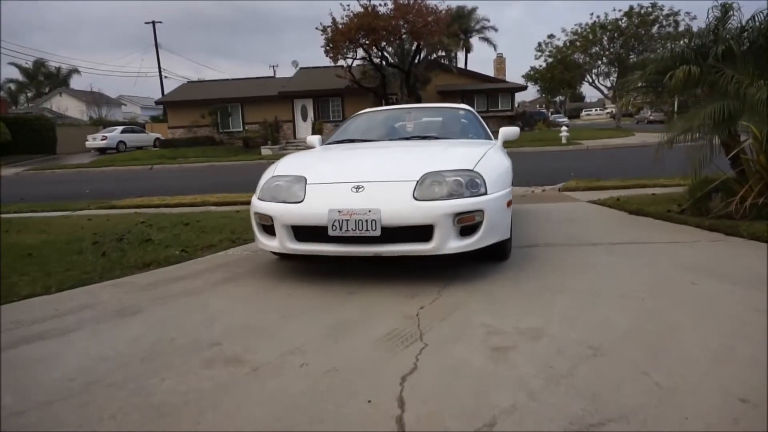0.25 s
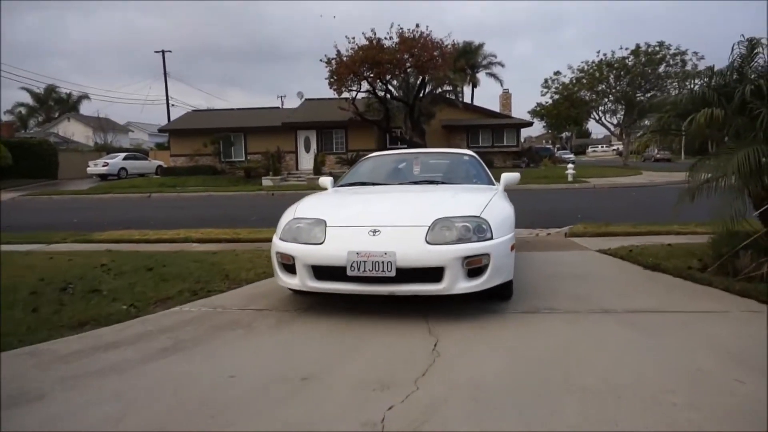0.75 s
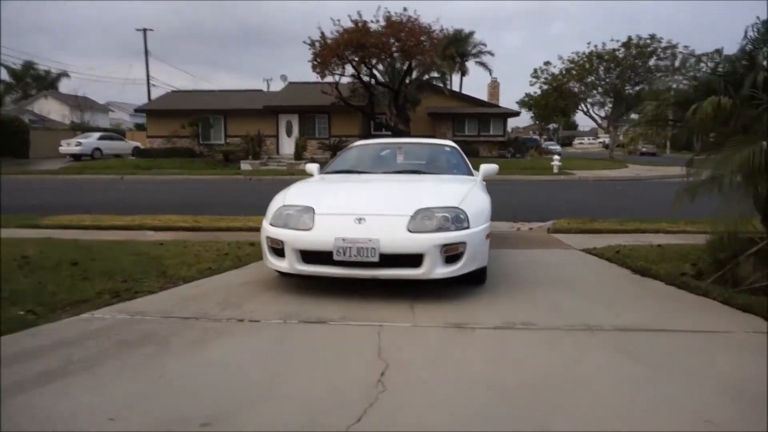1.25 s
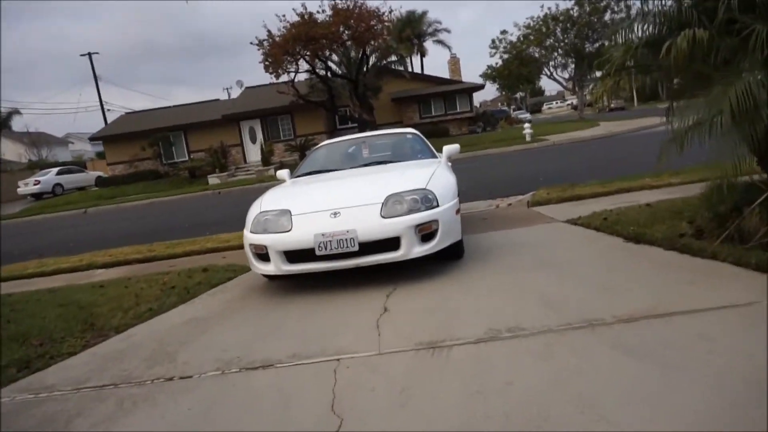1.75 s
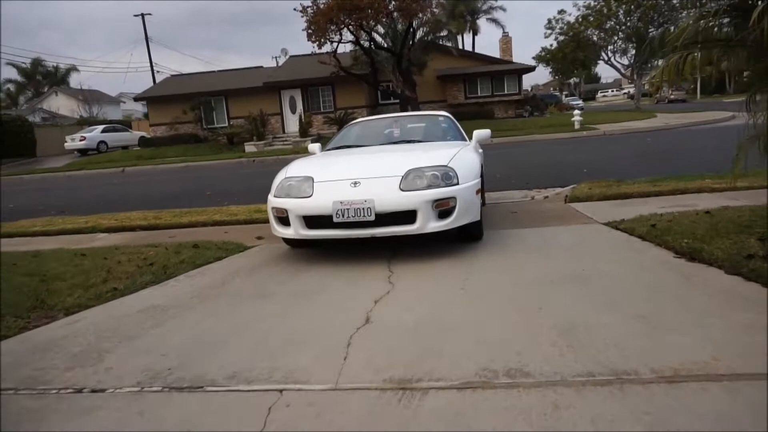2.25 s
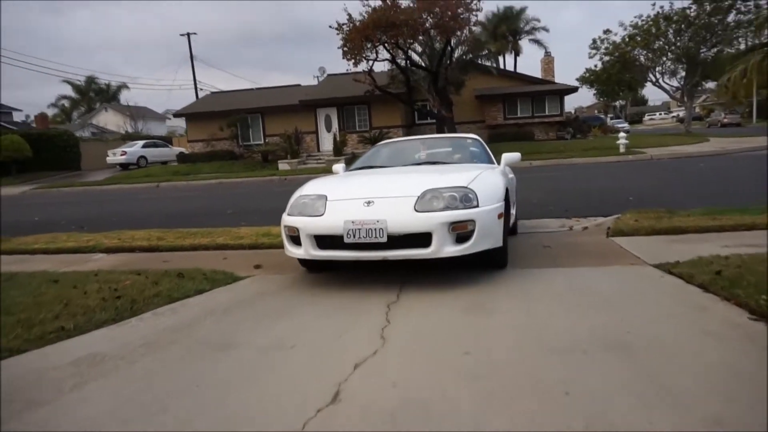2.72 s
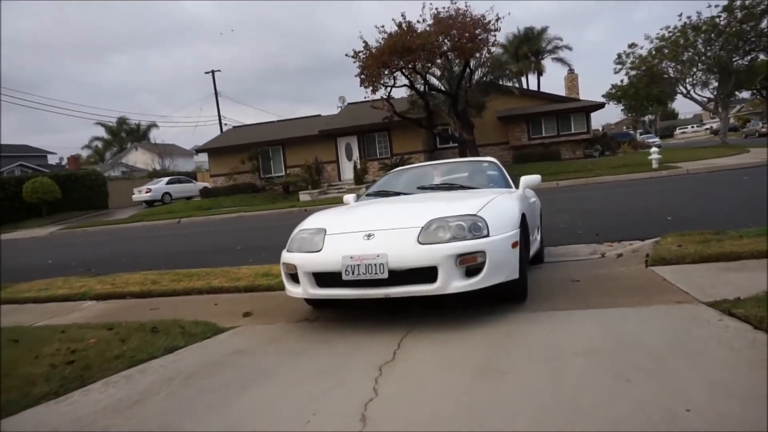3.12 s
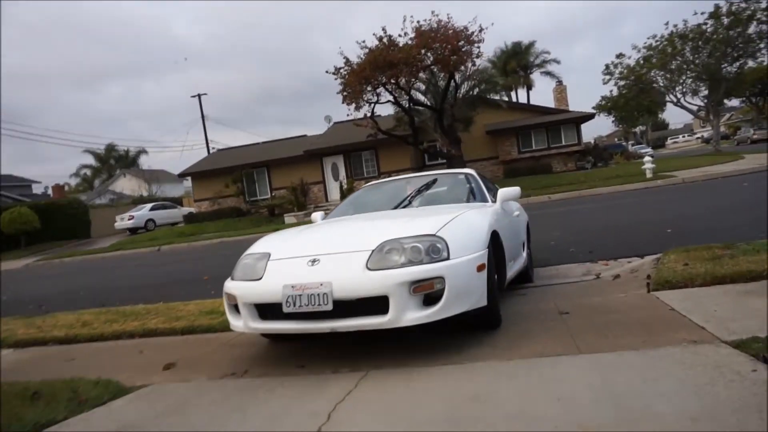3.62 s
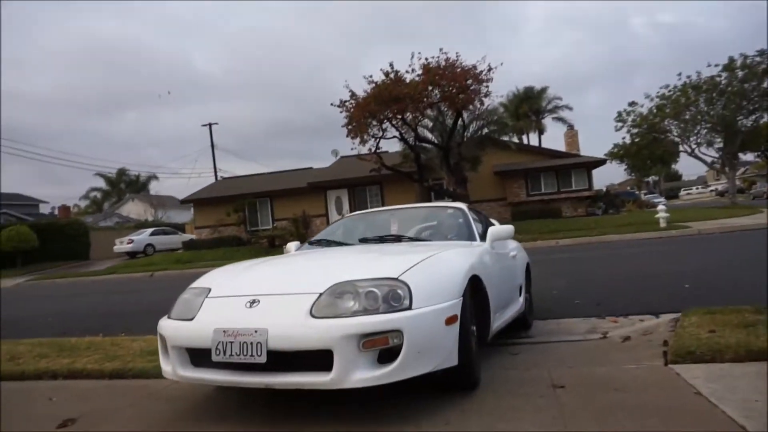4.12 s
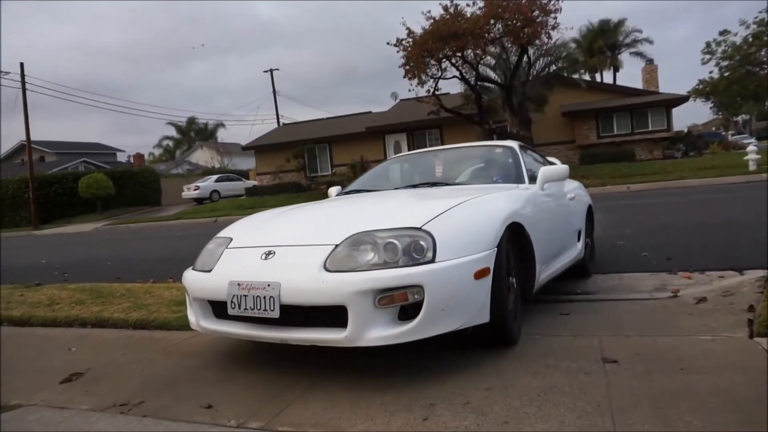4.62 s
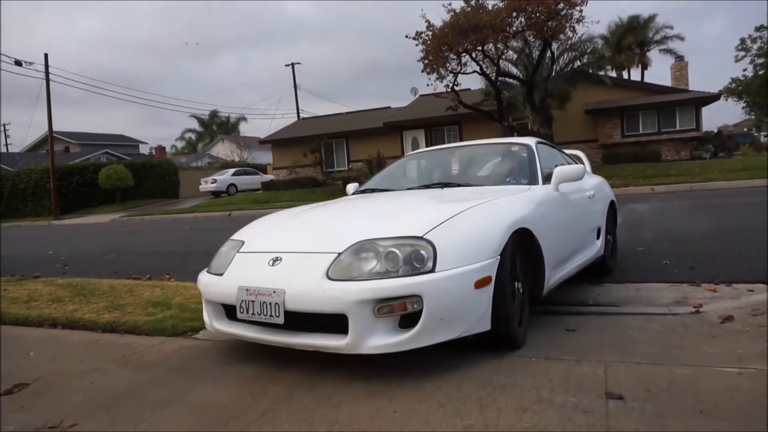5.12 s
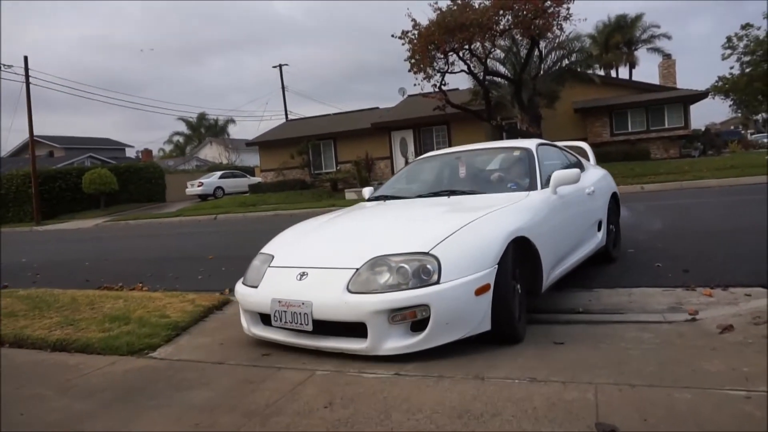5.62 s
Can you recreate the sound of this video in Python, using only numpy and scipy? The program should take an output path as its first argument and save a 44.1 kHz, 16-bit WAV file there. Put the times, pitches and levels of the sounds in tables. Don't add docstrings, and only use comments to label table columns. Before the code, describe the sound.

Outdoors, a low car faces the microphone at close range, its open exhaust burbling deep, fast and uneven over soft rumble and light breeze. Engine fan, belts and valve gear add a wide hiss and fine clatter. Grit snaps at 0.2 and 0.3 seconds; hollow bumper knocks follow at 0.4, 0.8 and in a cluster around 1.1 to 1.2, with heavier thuds at 1.5 to 1.6. The idle continues, boomier from about 2.2. Sharp body knocks land at 3.4 to 3.5 and 3.8, then a hard wind thump near 3.9, with the overall level briefly ducking after loud blows. From 3.8 the revs climb, smoother, with raspy intake, jumping at 4.7 to a throaty peak around 4.9. A thin high brake squeak slips in at 5.0 to 5.15 as the revs fall. The exhaust becomes quieter, leaving fading hiss and faint grit ticks until 5.9.

```python
import sys
import numpy as np
from scipy import signal
from scipy.io import wavfile

SR = 44100
rng = np.random.default_rng(int(sys.argv[2]) if len(sys.argv) > 2 else 0)


def rack_gain(trim_db):
    fader = np.asarray(trim_db, float)
    return 10 ** (fader / 20)


def store_pcm(level_fs):
    pcm = np.round(np.clip(level_fs, -1, 1) * 32767).astype(np.int16)
    wavfile.write(sys.argv[1], SR, np.atleast_2d(pcm).T)


N = 258862
STEP = 64

# start_s (centre), peak_db, half_length_s
GUSTS = [
    (.89, -42, .05),
    (1.07, -30, 0.045),
    (2.75, -32.5, 0.36),
    (3.27, -24.5, 0.12),
    (3.62, -28, .13),
    (3.93, -9, 0.039),
    (4.05, -18, 0.07),
    (4.143, -23, .015),
    (4.7, -21, 0.086),
]
BREEZE_DB = -25

RUMBLE_DB, RUMBLE_FOLLOWS, RUMBLE_LUMPS_DB = -17.5, 0.89, 2.5
SHELTER_S, SHELTER_FADE_S, SHELTER_DB = (4.72, 5.1), 0.1, -13

# start_s, peak_db
TICKS = [
    (0.2254, -10),
    (0.3054, -12),
    (1.5708, -22),
    (3.494, -22),
    (3.9277, -10),
    (4.02, -15),
    (4.25, -30),
    (5.3649, -28),
    (5.8237, -26),
]
# start_s, peak_db, pitch_hz, t60_s, crack_db
KNOCKS = [(0.442, -8.5, 466, 0.026, -6), (0.805, -14, 595, 0.04, -6), (1.123, -9.5, 660, 0.031, -6),
          (1.142, -15, 651, 0.028, -16), (1.164, -14, 540, 0.031, -17), (1.196, -7, 503, 0.018, -5),
          (1.208, -11, 593, 0.045, -19), (1.534, 1, 635, 0.023, -24), (1.606, -1, 704, 0.021, -27),
          (1.617, 0, 636, 0.017, -29), (2.75, -27, 630, 0.024, -2), (3.047, -16, 652.5, 0.024, 2),
          (3.43, -15, 592, 0.028, 6), (3.524, -4.5, 580, 0.03, -4), (3.53, -1.5, 560, 0.033, -17),
          (3.536, -6, 395, 0.052, -3), (3.54, -7.5, 940, 0.022, 4), (3.546, 2.5, 532, 0.031, -1),
          (3.775, -1.5, 379.5, 0.02, -6), (3.781, -3, 610, 0.022, -14), (3.788, -2, 571, 0.041, -6)]
# start_s (centre), pitch_hz, level_db
SQUEAK_GRIPS = [
    (5.038, 1605, -27),
    (5.063, 1560, -22),
    (5.102, 1595, -21.5),
    (5.14, 1570, -22),
]
GRIP_S, SAG_HZ_PER_S = 0.012, 2000

# start_s, level_db
RASP = [(3.85, -28), (3.95, -29), (4.03, -24.5), (4.2, -25), (4.48, -21), (4.7, -26), (4.92, -28.5),
        (5.08, -34.5), (5.45, -38)]
# pitch_hz, width_hz, level_db
RASP_RINGS = [
    (1409, 87, 13),
    (1340, 90, 5),
    (1460, 36, -5),
]

# start_s, level_db
BAY = [(0, -26), (.88, -27), (1.11, -30), (1.63, -29.5), (1.68, -29), (1.95, -28.5), (2.3, -26),
       (2.66, -24), (2.79, -26.5), (3.24, -29.5), (3.69, -29.5), (3.74, -26.5), (3.8, -29.5), (4.15, -31),
       (4.5, -25), (4.74, -26), (5.0, -25.5), (5.87, -36)]
BAY_MEAN_DB = -27
# pitch_hz, density_db (per hertz)
BAY_COLOUR = [(190, -33), (330, 0.5), (661, -4.5), (1110, -2.5), (1920, 1), (2330, -10), (3550, -17),
              (4450, -18), (6570, -24), (9220, -13.5), (15700, -17.5)]
# pitch_hz, width_hz, nose_db (facing us), flank_db (car turned)
BAY_RINGS = [(560, 51, 4, 0), (642, 31, 6.5, -21), (865, 79, 2, -4.5), (1372, 81, 9, -0.5),
             (1612, 17, -2, 1.5), (1982, 60, 7, -22), (2210, 147, -16, 9.5), (2675, 82, 1, -10),
             (3500, 335, 2, 3.5), (4030, 66, 1, -26), (5060, 85, 6.5, 7.5), (5520, 120, 0, 5.5),
             (6610, 460, -35.5, 11.5), (7430, 110, -55, 6.5), (6410, 500, 12.5, -0.5),
             (10350, 420, -8, 0.5), (12000, 1100, 0, 5)]
BAY_SPLIT_HZ = [340, 1100, 2600, 7800, 17000]
# over_db (over the bay), follows (share of its swing), turned_db (gain after the turn), scrub_db
BAY_LAYERS = [
    (0.54, 0.94, -1.5, -0.1),
    (-0.5, 0.62, -3, -1),
    (0.9, 1.01, 1.13, 0.3),
    (-7, 1.07, -2, 2),
]
# pitch_hz, likeness (0 to 1)
LIKENESS = [(60, 0.95), (150, 0.98), (380, 1), (950, 0.67), (2380, 0.67), (5980, 0.51), (15000, 0.48)]
# pitch_hz, lean_db
LEAN = [(60, 1.0), (150, 1.0), (380, -1.5), (950, 2.5), (2380, -3), (5980, 3), (15000, -0.5)]
# pitch_hz, lean_db
LEAN_TURNED = [(60, 0.5), (150, 0.0), (380, -5), (950, 1.5), (2380, -4), (5980, 5.5), (15000, 1.5)]
TURN_S = 3.84
SCRUB_S, SCRUB_FADE_S = (1.96, 2.44), 0.06

# start_s, turns_hz
CRANK = [(0, 25.4), (0.6, 25.55), (1.3, 25.75), (1.9, 25.4), (2.55, 24.85), (3.1, 24.95), (3.5, 25.2),
         (3.8, 25.5), (4.09, 30.1), (4.41, 34.4), (4.59, 37.9), (4.68, 45.5), (4.8, 62.5), (4.88, 65.8),
         (5.0, 65.8), (5.23, 53.6), (5.43, 46.3), (5.87, 36.3)]
# start_s, odd_cut_db (taken from the odd orders)
LOAD = [(0, 1.5), (3.8, 0), (4.02, 12), (4.42, 12.5), (4.58, 8.5), (4.68, -1), (4.82, -6.3), (5.35, 5.5),
        (5.87, 8)]
# start_s, level_db, bearing_db (ground echo's shift toward the higher resonances)
TAILPIPE = [(0, -9.5, -2.5), (.34, -12, -4.5), (.57, -9.5, 9), (.87, -11, -2.5), (1.11, -13.5, 14.5),
            (1.32, -13, 2.5), (1.5, -14.5, 7.5), (1.82, -11.5, 2.2), (2.3, -12, -0.5), (2.9, -10, -2),
            (3.8, -13.5, -0.5), (4.15, -13, 8.5), (4.5, -12.5, 11.5), (4.65, -6, 5.5), (4.93, -9.5, 7.5),
            (5.09, -17.5, 8.5), (5.3, -19, 0), (5.87, -24, 3)]
# pitch_hz, width_hz, gas_db (puffs against tone), level_db, bearing_share
PIPE = [
    (99.6, 14, -26, -7.5, 0.053),
    (175.9, 34, -12, 0.05, -0.31),
    (246.1, 25.6, -12, -7, 0.61),
    (522, 147, -0.6, -22.5, 0.8),
]
EVENING = (0.41, 0.75, 0.75, 0.62)
# pitch_hz, width_hz, level_db
UPPER_PIPE = [
    (312, 22, -11),
    (390, 24, -19),
]
# order (multiple of crank rate), level_db
ORDER_DB = [(1, -4), (2, 9.5), (3, 6.5), (4, 6.5), (5, 1), (6, -4.5), (7, 0), (8, 0.5), (9, -5), (10, 1.5),
            (14, -5), (24, -49)]
HALF_ORDER_DB, WOBBLE_DB, FLUTTER_DB = -22.5, -0.5, 1.26
GUTTER_S, GUTTER_FADE_S, GUTTER_BOOM_DB = (2.17, 4.2), 0.57, 3
THROTTLE_S, THROTTLE_FADE_S, THROTTLE_ROAR_DB = (4.7, 5.14), 0.052, 5.5

DUCK_OVER_DB, DUCK_SHARE, RECOVER_DB_PER_S, DUCK_ATTACK_S = 1, 1, 60, 0.005


def rms_one(x):
    return x / np.sqrt(np.mean(x ** 2) + 1e-20)


def in_time(rows):
    s, *columns = np.transpose(rows)
    return [np.interp(np.arange(N) / SR, s, c) for c in columns]


def at_hz(points, hz):
    pitch_hz, value = np.transpose(points)
    return np.interp(np.log(hz), np.log(pitch_hz), value)


def fine(coarse):
    return np.interp(np.arange(N) / STEP, np.arange(len(coarse)), coarse)


def drift(rate):
    r = np.exp(-2 * np.pi * rate * STEP / SR)
    chance = rng.standard_normal(N // STEP + 1001)
    return rms_one(signal.lfilter([1], [1, -2 * r, r * r], chance)[1000:])


def plateau(span, fade):
    t = np.arange(0, N, STEP) / SR
    return np.clip(np.minimum(t - span[0], span[1] - t) / fade, 0, 1)


def bumps(rows):
    s, db, half = np.transpose(rows)[:, :, None]
    return rack_gain(db) * np.exp(-((np.arange(N) / SR - s) / half) ** 2)


def sounding(rows):
    t = np.arange(N) / SR
    return np.clip(np.minimum(t - rows[0][0], rows[-1][0] - t) / 0.004, 0, 1)


def resonate(x, hz, width):
    r = np.exp(-np.pi * width / SR)
    poles = [1, -2 * r * np.cos(2 * np.pi * hz / SR), r * r]
    return signal.lfilter([(1 - r * r) / 2, 0, (r * r - 1) / 2], poles, x)


def band(x, low, high, order=2):
    return signal.sosfilt(signal.butter(order, [low, high], "band", fs=SR, output="sos"), x)


def peak_power(hz, centre, width):
    return 1 / (1 + (2 * (hz - centre) / width) ** 2) ** 2


def gusts():
    lumps = rack_gain(5.7 * np.array([fine(drift(48.0)), fine(drift(43.0))]))
    thump = band(rng.standard_normal((2, N)) * lumps, 94, 317)
    flutter = band(rng.standard_normal((2, N)) * lumps, 210, 660)
    breeze = rack_gain(BREEZE_DB + in_time(TAILPIPE)[0])
    return (breeze + bumps(GUSTS).sum(axis=0)) * rms_one(thump + 0.059 * flutter)


def rumble():
    mid, side = band(rng.standard_normal((2, N)), 30.5, 110, order=1)
    level_db = RUMBLE_DB + RUMBLE_FOLLOWS * in_time(TAILPIPE)[0]
    level_db = level_db + RUMBLE_LUMPS_DB * fine(drift(3.0))
    level_db = level_db + SHELTER_DB * fine(plateau(SHELTER_S, SHELTER_FADE_S))
    return rack_gain(level_db) * (rms_one(mid) + 0.33 * rms_one(side) * [[1], [-1]])


def ticks():
    clicks = np.zeros(N)
    for s, db in TICKS:
        clicks[round(s * SR)] = rack_gain(db - 6.0)
    snap = rng.standard_normal(200) * np.exp(-np.arange(200) / 94.0)
    return band(np.convolve(clicks, snap)[:N] + 1e-18, 2500, 18000)


def knocks():
    out, t = np.zeros(N), np.arange(SR // 10) / SR
    cracks = band(rng.standard_normal((len(KNOCKS), len(t))), 230, 1420) * np.exp(-t / 0.0029)
    for (s, level_db, hz, t60, crack_db), crack in zip(KNOCKS, cracks):
        fade = rack_gain(-60 * t / t60)
        upper = 0.39 * np.sin(2 * np.pi * 1.705 * hz * t)
        lower = 0.63 * np.sin(2 * np.pi * 0.59 * hz * t)
        ring = np.sin(2 * np.pi * hz * t) + (upper + lower) * fade
        soft_start = 1 - np.exp(-t / 0.0012)
        blow = rack_gain(level_db + 4.0) * (ring * fade + 2 * rack_gain(crack_db) * crack) * soft_start
        at = round(s * SR)
        out[at:at + len(t)] += blow[:N - at]
    return out


def squeak():
    grips = bumps([(s, db, GRIP_S) for s, hz, db in SQUEAK_GRIPS])
    t = np.arange(N) / SR
    s, hz, _ = np.transpose(SQUEAK_GRIPS)[:, grips.argmax(axis=0)]
    sagging_hz = hz - SAG_HZ_PER_S * np.clip(t - s, -0.03, 0.03) + 8 * fine(drift(38))
    phase = 2 * np.pi * np.cumsum(sagging_hz) / SR
    return grips.sum(axis=0) * rack_gain(5.0) * np.sin(phase + [[0.5], [-0.5]]) * rack_gain([[-0.8], [0.8]])


def rasp(turn):
    breath = rng.standard_normal((2, N)) * (1 + 0.5 * np.cos(3 * turn))
    rung = 0
    for hz, width, db in RASP_RINGS:
        rung = rung + rack_gain(db) * resonate(resonate(breath, hz, width), hz, width)
    mid, side = rms_one(rung)
    level = rack_gain(in_time(RASP)[0] - 1.5 + 2.1 * fine(drift(5.0)))
    return sounding(RASP) * level * (mid + 0.14 * side * [[1], [-1]])


def bay_source(turn, turned):
    white = rng.standard_normal((2, 2, N))
    strokes = rng.random(N) < 900 / SR
    clatter = strokes * rack_gain(3.8 * np.minimum(rng.exponential(1, N), 4)) * rng.choice([-1, 1], N)
    white[:, 0] += 0.4 * rms_one(clatter)
    white *= 1 + 0.048 * np.cos(3 * turn)
    rings = 0
    for hz, width, nose_db, flank_db in BAY_RINGS:
        level_db = nose_db + (flank_db - nose_db) * turned + 1.8 * drift(1)
        rings = rings + fine(rack_gain(level_db)) * resonate(white, hz, max(width, 65))
    return white * [[1], [0.6]] + rings


def engine_bay(turn):
    turned = (np.arange(N // STEP + 1) * STEP / SR > TURN_S).astype(float)
    source = bay_source(turn, turned)
    swing_db = in_time(BAY)[0] - BAY_MEAN_DB
    scrub = fine(plateau(SCRUB_S, SCRUB_FADE_S))
    out, together, deal = 0, drift(1.17), 0
    for low, high, (over_db, follows, turned_db, scrub_db) in zip(BAY_SPLIT_HZ, BAY_SPLIT_HZ[1:], BAY_LAYERS):
        level_db = BAY_MEAN_DB + over_db + follows * swing_db + turned_db * fine(turned) + scrub_db * scrub
        edges, layer = np.geomspace(low, high, 4), 0
        shared = drift(38.0)
        for a, b in zip(edges, edges[1:]):
            deal = 1 - deal
            mid, side = band(source[deal], a, b)
            hz = np.sqrt(a * b)
            alike = 1.5 * at_hz(LIKENESS, hz) - 0.4 - 0.097 * turned + 0.064 * drift(2.2)
            alike = np.clip(alike, 0, 1)
            flicker_db = 0.5 * together + 0.5 * shared + 1.0 * drift(17.0)
            gain = rack_gain(at_hz(BAY_COLOUR, hz)) * fine(rack_gain(flicker_db))
            nose_lean_db = at_hz(LEAN, hz)
            lean_db = fine(nose_lean_db + turned * (at_hz(LEAN_TURNED, hz) - nose_lean_db))
            lean = rack_gain(lean_db * [[0.5], [-0.5]])
            spread = fine(np.sqrt(1 - alike)) * side * [[1], [-1]]
            layer = layer + gain * lean * (fine(np.sqrt(1 + alike)) * mid + spread)
        out = out + rack_gain(level_db) * layer / np.sqrt(np.mean(layer.mean(axis=0) ** 2))
    return out


def crank():
    rate = in_time(CRANK)[0]
    return rate, 2 * np.pi * np.cumsum(rate) / SR


def firing_power(orders, load_db):
    even_db = np.interp(orders, *np.transpose(ORDER_DB)) + HALF_ORDER_DB * (orders % 1 > 0)
    high_odd = (orders % 2 == 1) & (orders > 6)
    load_share = 1.3 * (orders == 6) - 1.15 * (orders == 3) - high_odd
    return rack_gain(even_db) ** 2 * rack_gain(load_db * load_share) ** 2


def pipe_response(orders, rate):
    load_db = in_time(LOAD)[0][::STEP]
    heard_db, bearing_db = np.array(in_time(TAILPIPE))[:, ::STEP]
    firing = firing_power(orders, load_db)
    hz = orders * rate[::STEP]
    boom_db = GUTTER_BOOM_DB * plateau(GUTTER_S, GUTTER_FADE_S)
    roar_db = THROTTLE_ROAR_DB * plateau(THROTTLE_S, THROTTLE_FADE_S) + 0.91 * np.minimum(load_db, 0)
    power, pipe = 0, []
    for (centre, width, _, level_db, lean), swell_db, even in zip(PIPE, [boom_db, 0, 0, roar_db], EVENING):
        share = firing * peak_power(hz, centre, width)
        flutter_db = FLUTTER_DB * drift(2.5)[:len(heard_db)]
        level_db = level_db + heard_db + lean * bearing_db + flutter_db + swell_db
        share = share * rack_gain(level_db) ** 2 / share.sum(axis=0) ** even
        power = power + share
        pipe.append(np.sqrt(share.sum(axis=0)))
    for centre, width, level_db in UPPER_PIPE:
        power = power + firing * (pipe[2] * rack_gain(level_db)) ** 2 * peak_power(hz, centre, width)
    return power, pipe


def exhaust(rate, turn):
    orders = np.r_[1:10:.5, 10:25][:, None]
    power, pipe = pipe_response(orders, rate)
    tone = np.zeros((2, N))
    for order, p in zip(orders[:, 0], power):
        swell = fine(np.sqrt(2 * p) * rack_gain(WOBBLE_DB * drift(5)[:len(p)]))
        phase = order * turn + 0.46 * np.pi * order ** 2 + 0.11 * fine(drift(6))
        skew = 0.033 + 0.026 * order ** 0.5 + 0.027 * fine(drift(4.5))
        tone += swell * np.sin([phase + skew, phase - skew])
    white, puffs = rng.standard_normal(N), 0
    for (centre, width, gas_db, *_), gain in zip(PIPE, pipe):
        gas = resonate(resonate(white, centre, 0.81 * width), centre, 0.81 * width)
        puffs = puffs + fine(gain) * rack_gain(gas_db) * rms_one(gas)
    return tone + puffs


def scene():
    rate, turn = crank()
    air = gusts() + rumble()
    body = ticks() + knocks() + squeak()
    engine = rasp(turn) + engine_bay(turn) + exhaust(rate, turn) * rack_gain([[0.3], [-0.3]])
    return air + body + engine


def band_limit(x):
    return signal.sosfilt(signal.butter(12, 15780, fs=SR, output="sos"), x)


def record(dry):
    ramp = RECOVER_DB_PER_S * np.arange(N) / SR
    peak_db = 20 * np.log10(np.abs(dry).max(axis=0) + 1e-9)
    held_db = np.maximum.accumulate(peak_db + ramp) - ramp
    r = np.exp(-1 / (DUCK_ATTACK_S * SR))
    duck_db = signal.lfilter([1 - r], [1, -r], DUCK_SHARE * np.maximum(held_db - DUCK_OVER_DB, 0))
    mix = 1.266 * np.tanh(dry * rack_gain(-duck_db) / 1.335)
    return band_limit(mix)


dry = scene()
out = record(dry)
store_pcm(out)
```